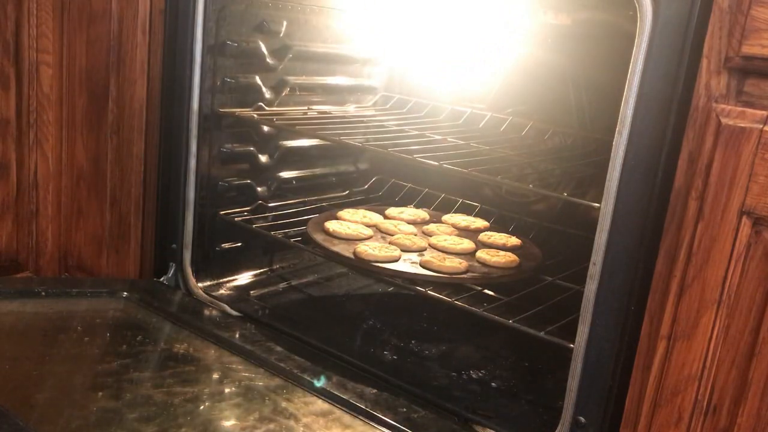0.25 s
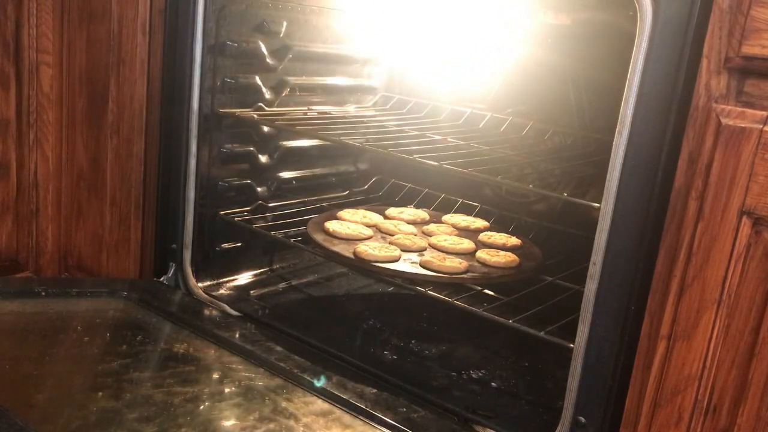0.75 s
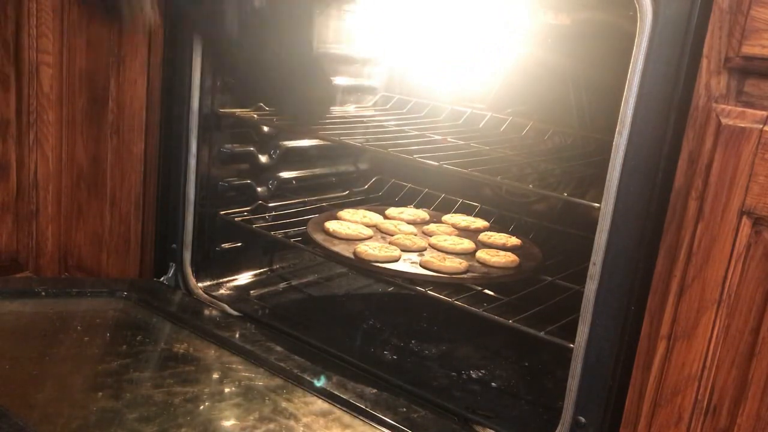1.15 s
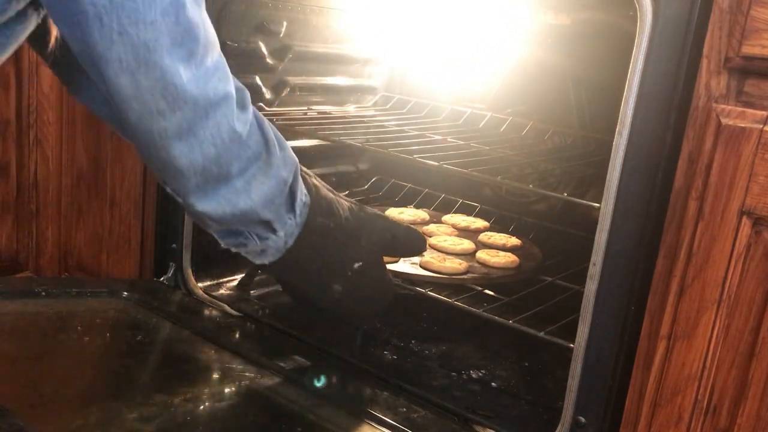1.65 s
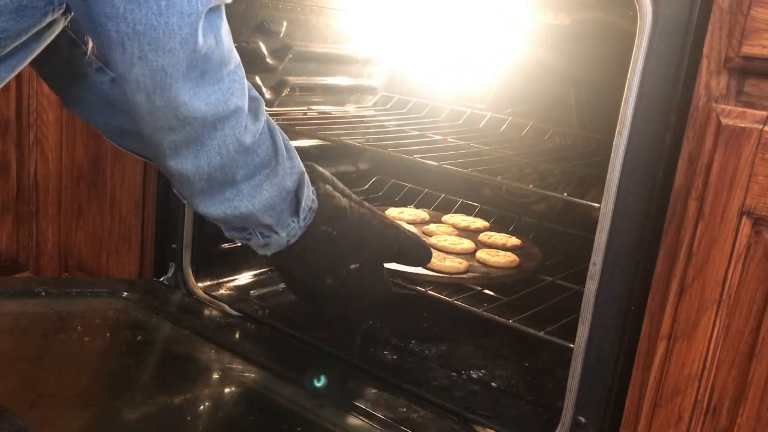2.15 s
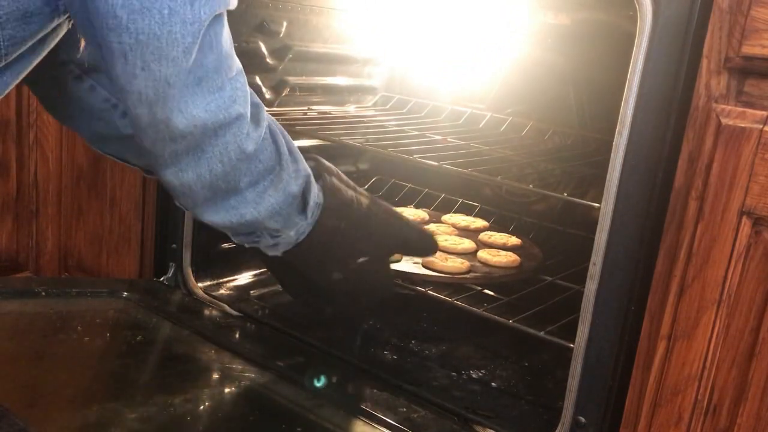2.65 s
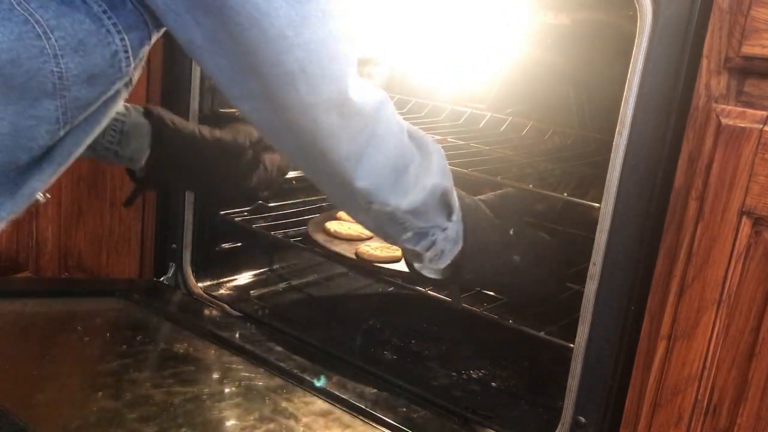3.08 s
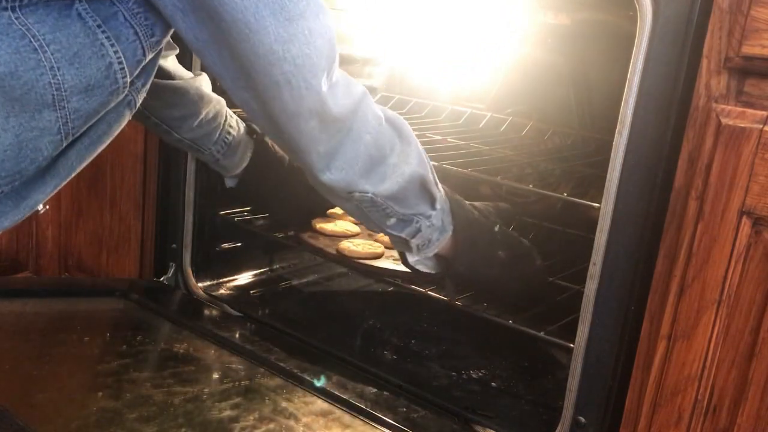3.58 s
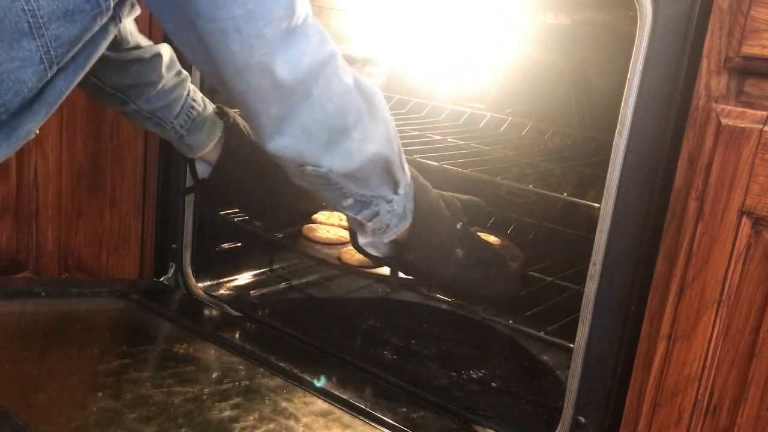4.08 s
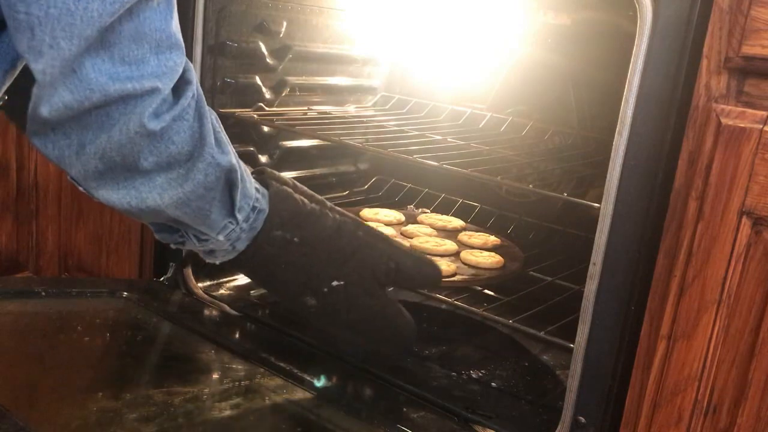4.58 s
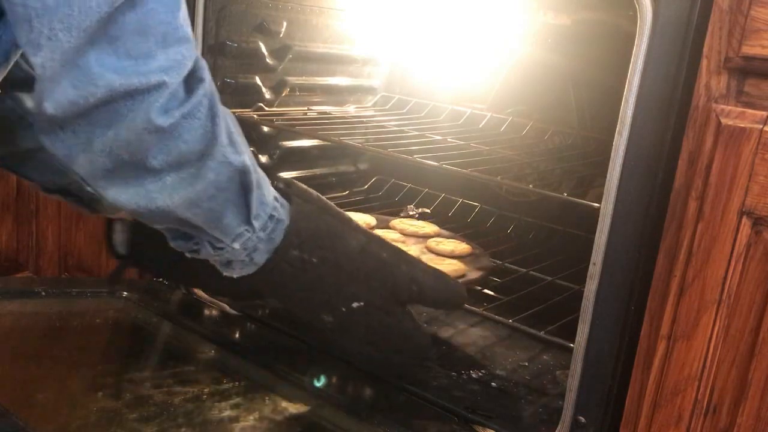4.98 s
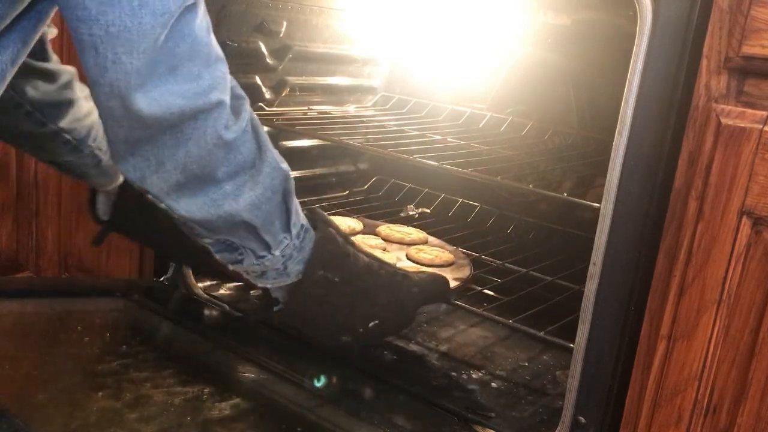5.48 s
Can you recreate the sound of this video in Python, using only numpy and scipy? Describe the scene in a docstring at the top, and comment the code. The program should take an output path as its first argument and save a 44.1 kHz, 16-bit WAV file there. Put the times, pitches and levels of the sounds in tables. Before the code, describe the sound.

A cupboard door bangs twice, then a metal baking pan clanks, scrapes and squeals over a wire oven rack.

```python
"""Baking pan out of the oven

A kitchen cupboard bangs twice nearby, a hard crack over a wooden boom. Then mitts work a metal pan
out of the open oven in short pulls: it clanks, scrapes and squeals over the wire rack, ringing and
shaking the oven's steel box. Sleeves rustle over faint room noise, all picked up by two closely
spaced microphones."""
import sys
import numpy as np
from scipy import signal
from scipy.fft import rfft, irfft
from scipy.io import wavfile
from scipy.ndimage import map_coordinates

SR = 44100
rng = np.random.default_rng(int(sys.argv[2]) if len(sys.argv) > 2 else 0)


def unload_wav(signal):
    """Save mono or channel-first audio to the path in sys.argv[1] as 16-bit WAV at rate SR, clipped to [-1, 1]."""
    wavfile.write(
        sys.argv[1],
        SR,
        np.round(np.clip(np.atleast_2d(signal).T, -1, 1) * 32767).astype(np.int16),
    )


N = 252693
TIME = np.arange(N) / SR

# kitchen reverb: (frequency [Hz], t60 [s])
ROOM_T60 = [(60, 0.92), (200, 0.6), (600, 0.46), (1500, 0.64), (3500, 0.54), (8000, 0.45), (15000, .36)]
# tone of the room noise: (frequency [Hz], level [dB])
ROOM_TONE = [(25, -19), (65, -3), (130, -8.5), (240, -8), (450, -12), (800, -17.5), (1800, -23),
             (3200, -25), (6200, -32), (10000, -34.5), (15000, -34.5)]

# sleeve and mitt swishes, one per arm movement: (time [s], half length [s], level [dB])
SWISHES = [(.55, 0.11, -68), (.8, 0.12, -72), (1.36, 0.32, -70), (2.797, 0.076, -60.5),
           (3.001, 0.032, -60.5), (3.242, 0.043, -60.5), (3.373, 0.034, -67.5), (3.576, 0.042, -52.5),
           (3.873, 0.13, -56.5), (4.177, 0.041, -59.5), (4.483, 0.022, -68), (4.977, 0.087, -54),
           (5.17, 0.026, -60), (5.366, 0.031, -65.5), (5.686, 0.085, -52.5)]
# tone of slipping cloth: (frequency [Hz], level [dB])
CLOTH_TONE = [(250, -21.5), (600, -17), (1100, -2), (2000, -5.5), (3500, -3.5), (7000, -5.5), (10000, -9),
              (15000, -9)]
# a mitt rubbing over the rim: (time [s], half length [s], level [dB])
RUBS = [(1.968, 0.0096, -74.5), (2.185, 0.025, -61.5), (2.375, 0.06, -71.5), (2.458, .01, -66),
        (4.846, .012, -53), (5.694, 0.02, -58)]
# tone of a mitt on metal: (frequency [Hz], level [dB])
RUB_TONE = [(200, -30), (900, 9.5), (3000, 8), (4300, 0), (6000, -1.5), (15000, -6)]
# soft hollow bumps: (time [s], peak level [dB])
BUMPS = [(0.124, -54), (1.892, -46), (2.745, -46.5), (3.058, -42)]

# cupboard hits: (time [s], contact [dB], rattle decay [s], treble gain [dB], thump [dB])
CUPBOARD_BANGS = [(.2489, 7.5, 0.00024, -3.5, -3), (.2567, -1.5, 0.0011, -9, -14),
                  (.266, -14, 0.0035, -2, 0), (.395, -13, 0.0043, -3, -16.5),
                  (.416, -20.5, 0.041, -1.5, -15), (.8688, 3, 0.0026, -17.5, -5),
                  (.8722, 7.5, 0.0026, 3, -4.5), (.884, 0, 0.046, -5, 5), (1.012, -38, 0.026, -4, -34)]
# tone of the door's crack: (frequency [Hz], level [dB])
CRACK_TONE = [(50, -21), (200, 1), (500, 2.5), (750, 2), (1200, 1.5), (2000, 5), (3300, 4.5), (4600, -1.5),
              (6500, -6), (9000, -12), (15000, -22)]
# ring of the door's catch: (frequency [Hz], energy [dB], t60 [s])
LATCH_MODES = [(1307, -5, 0.0063), (1510, -5, 0.0069), (2654, -7.5, 0.015), (3024, -1, 0.0063),
               (3860, -21.5, .008), (6010, -10.5, 0.0042)]
# boom of the wooden carcass: (frequency [Hz], energy [dB], t60 [s])
CUPBOARD_MODES = [(57.2, -10.5, 0.96), (72.6, -8.5, 0.14), (126, -6, 0.044), (178.5, -6, 0.13),
                  (216.6, -4.5, .13), (285, -7.5, 0.066), (330.7, -8, 0.055), (408, -12, 0.089),
                  (550, -11, 0.047), (716, -16.5, .05)]

# ring of the oven's steel box: (frequency [Hz], energy [dB], t60 [s])
OVEN_MODES = [(77.2, -7.5, 0.25), (175.6, -9, 0.21), (209.3, -10.5, 0.42), (240.4, -4.5, 0.41),
              (316, -9.5, 0.99), (374.3, -13, 0.42), (508, -29.5, 0.38), (607, -15, 0.14)]
# tone of the box's rumble: (frequency [Hz], level [dB])
RUMBLE_TONE = [(60, -29), (120, -5.5), (170, -2.5), (240, -6), (330, 0.5), (450, -10), (900, -8),
               (3000, -50.5)]
# tone of the box's deep boom: (frequency [Hz], level [dB])
BOOM_TONE = [(25, -33.5), (50, -1.5), (75, -2.5), (110, -19.5), (200, -32), (1000, -59)]

# light, bright ticks of metal: (time [s], level [dB])
TICKS = [(1.755, -38), (2.201, -16.5), (2.206, -21), (2.451, -36), (3.146, -30)]
# tone of a tick: (frequency [Hz], level [dB])
TICK_TONE = [(300, -5), (2000, 0.5), (4500, -7.5), (6000, 2.5), (6900, 11), (8500, -1), (12000, 2),
             (15500, 0.5)]
# squeals and groans of pan on wire:
# (start [s], end [s], start pitch [Hz], end pitch [Hz], bandwidth [Hz], level [dB])
SQUEALS = [(3.551, 3.604, 3026, 3260, 204, -45.5), (3.688, 3.702, 3280, 3300, 210, -42),
           (3.67, 4.17, 324, 320, 21, -49.5), (4.087, 4.264, 2800, 2790, 80, -62),
           (4.037, 4.25, 4270, 4340, 190, -68), (5.216, 5.295, 890, 550, 41, -57),
           (5.313, 5.5, 835, 800, 70, -52), (4.8, 5.5, 360, 330, 28, -53),
           (5.604, 5.77, 4130, 4600, 187, -58.5)]
# pan hitting the rack: (time [s], contact [dB], rattle decay [s], treble gain [dB], thump [dB])
PAN_CLANKS = [(1.684, -18.5, 0.026, -13, -14), (2.631, -40, 0.03, -6, -32),
              (3.044, -7.5, 0.014, 0.5, -16.5), (3.375, -26.5, 0.017, 3, -24),
              (3.515, -19.5, 0.044, 6.5, -9.5), (3.56, -8.5, 0.049, -2, -10),
              (3.595, -14, 0.0098, -5, -9.5), (3.694, -10, 0.0092, -0.5, -8.5),
              (3.756, -12.5, 0.043, -3, -16), (4.2455, -5, 0.017, 5, -12.5),
              (4.588, -31, 0.0082, 11, -23.5), (4.76, -10, 0.014, 3.5, -11.5), (4.911, 3, 0.021, -9, -9),
              (5.011, 5, 0.036, -3.5, -4), (5.07, 9.5, 0.018, -1, -9), (5.1, 5.5, 0.0066, -25, -4),
              (5.2, -15.5, 0.005, -3, -18), (5.505, -14.5, 0.017, -15, -21), (5.526, -8, 0.054, -16, -11)]
# short pulls over the rack: (start [s], length [s], scrape [dB], judder [dB])
PULLS = [(3.507, 0.13, -52, -45), (3.667, 0.29, -44, -52), (3.986, 0.39, -55, -64.5),
         (4.766, 0.15, -42, -54), (4.907, .19, -30.5, -48), (5.104, 0.11, -45.5, -42.5),
         (5.525, .09, -47, -46.5), (5.646, .11, -41.5, -57)]
# tone of pan-on-rack contact: (frequency [Hz], level [dB])
PAN_TONE = [(60, -20), (250, -7.5), (450, -1), (1000, 3.5), (1600, 2), (3000, -0.5), (4200, -5.5),
            (5200, -11.5), (7200, -11.5), (10000, -18), (15000, -28.5)]
# ring of the pan: (frequency [Hz], energy [dB], t60 [s])
PAN_MODES = [(797, -19, 0.98), (855, -13, 1), (937, -16.5, 1), (1040, -18, 0.5), (1190, -26, 1),
             (1516, -14, 0.31), (1625, -6.5, 0.18), (1713, -22, 1), (2276, -30.5, 0.14), (2400, -61, 0.62),
             (2640, -28, 0.39), (2880, -17, 0.21), (3550, -35, 0.14), (3880, -27.5, 0.81),
             (5650, -29, 0.13), (7170, -60, 0.2)]

REGRIP_S, GRIPPED_DB, FREE_DB = (4.24, 4.7), -7, -4  # the pan rings freer while the mitts change hold
PRESS_DB = -29  # scrape level at which the pan is pressed down hard enough to halve its ring
SIDE = np.array([[1], [-1]])  # opposite polarity, left and right


def amp(db):
    """Decibels to gain."""
    return 10 ** (np.asarray(db) / 20)


def unit(x):
    """Scale to an energy of one."""
    return x / np.sqrt(np.sum(x ** 2) + 1e-20)


def at_hz(points, hz):
    """Read a table on a log-frequency axis."""
    f, value = np.transpose(points)
    return np.interp(np.log(np.maximum(hz, 1)), np.log(f), value)


def convolve(x, response):
    """Pass a sound through an impulse response."""
    return signal.fftconvolve(x, response)[:len(x)]


def filtered(x, hz, kind="low", order=2):
    """Pass a sound through a gentle filter."""
    return signal.sosfilt(signal.butter(order, hz, kind, fs=SR, output="sos"), x)


def colour(tone, size=4096):
    """An EQ curve as a minimum-phase response of unit energy."""
    gains = amp(at_hz(tone, np.arange(size // 2 + 1) * SR / size))
    cepstrum = irfft(np.log(gains))
    cepstrum[1:size // 2] *= 2
    return unit(irfft(np.exp(rfft(cepstrum[:size // 2 + 1], size))))


def dying(t60):
    """One second of exponential decay."""
    return amp(-60 * TIME[:SR] / t60)


def swell(time, width):
    """A smooth rise and fall around one moment."""
    return np.exp(-.5 * ((TIME - time) / width) ** 2)


def ringing(modes):
    """Response of a struck body: a damped sine per mode, signs alternating."""
    return sum((-1) ** k * amp(db) * unit(np.sin(2 * np.pi * hz * TIME[:SR]) * dying(t60))
               for k, (hz, db, t60) in enumerate(modes))


def grains(per_s, spread_db):
    """Tiny contacts of uneven size at random moments; rms 1."""
    sizes = amp(spread_db * np.minimum(rng.exponential(1, N), 4)) * rng.choice([-1, 1], N)
    return unit(sizes * (rng.random(N) < per_s / SR)) * np.sqrt(N)


def blows(hits, per_s, click_s):
    """Each hit is a sharp contact that rattles out, plus a thump on the heavy body."""
    contact, thump = np.zeros((2, N + SR))
    chatter = grains(per_s, spread_db=-0.5)
    for time, db, decay_s, treble_db, thump_db in hits:
        at = int(time * SR)
        burst = unit(np.roll(chatter, -at)[:SR] * np.exp(-TIME[:SR] / decay_s))
        burst[0] += click_s / decay_s  # a short hit is one clean click, a long rattle starts softly
        burst = unit(burst)
        treble = filtered(burst, 3500, "high", order=1)
        contact[at:at + SR] += amp(db) * (burst + (amp(treble_db) - 1) * treble)
        thump[at] += amp(thump_db)
    return contact[:N], thump[:N]


def pull(start, length, attack_s=0.028, release_s=0.024):
    """Envelope of one pull: it takes hold, keeps its force and dies away."""
    age = np.maximum(TIME - start, 0)
    return np.minimum(age / attack_s, 1) * np.exp(-np.maximum(age - length, 0) / release_s)


def arm_movement(stretch=1):
    """Envelope of the moving arms: each swish swells and fades."""
    return np.sqrt(sum((amp(db) * swell(time, width * stretch)) ** 2 for time, width, db in SWISHES))


def diffuse(source, side_db):
    """A wide source reaches both microphones alike in the bass and ever less alike in the treble."""
    return source() + amp(side_db) * np.gradient(source()) * SIDE


def kitchen(x, early_db, early_t60, wet_db, build_up_s, wide_hz):
    """Direct sound, quick reflections off nearby panels and a tail dying band by band."""
    edges = np.geomspace(30, 18000, num=15)
    white = rng.standard_normal((2, 2, SR))
    echoes = 0
    for k, (low, high) in enumerate(zip(edges, edges[1:])):
        mid, side = filtered(white[k % 2], [low, high], "band")
        hz = np.sqrt(low * high)
        tail = unit(dying(at_hz(ROOM_T60, hz)) * (1 - np.exp(-TIME[:SR] / build_up_s)))
        decay = np.hypot(amp(early_db) * unit(dying(early_t60)), amp(wet_db) * tail)
        band_gain = np.sqrt(2 * (high - low) / SR * np.sum(decay ** 2))
        angle = np.pi / 4 * min(hz / wide_hz, 1)  # the image opens up toward the treble
        stereo = np.cos(angle) * unit(mid * decay) + np.sin(angle) * unit(side * decay) * SIDE
        echoes = echoes + band_gain * stereo
    return np.array([x + convolve(x, channel) for channel in echoes])


def room_noise(floor_db=-63, stir_db=-2.5):
    """A soft, bass-heavy bed, a little fuller while the cook moves."""
    gain = np.hypot(amp(floor_db), amp(stir_db) * arm_movement(stretch=3))
    return gain * convolve(rng.standard_normal(N), colour(ROOM_TONE))


def rack_wires(count=70, low_hz=1493, high_hz=14870, t60=0.18):
    """Response of the rack: every wire has a thin note of its own."""
    spots = (np.arange(count) + rng.random(count)) / count
    notes = low_hz + (high_hz - low_hz) * spots
    return unit(ringing([(hz, db, t60) for hz, db in zip(notes, rng.normal(0, 3, count))]))


def sleeves_and_mitts():
    """Denim slips in a fine hiss; mitts brush the wires in a pull and rub coarsely over the rim."""
    swish = amp(7) * arm_movement() * convolve(grains(per_s=15000, spread_db=2), colour(CLOTH_TONE))
    on_rack = np.minimum(sum(pull(start, length) for start, length, _, _ in PULLS), 1)
    brushed = amp(-3.5) * convolve(swish * on_rack, rack_wires())
    rub_gain = sum(amp(db) * swell(time, width) for time, width, db in RUBS)
    rub = rub_gain * convolve(grains(per_s=10000, spread_db=7), colour(RUB_TONE))
    return swish + brushed + rub


def bumps(hz=229, width_s=0.012):
    """A padded touch swells and fades on one low note."""
    return np.sin(2 * np.pi * hz * TIME) * sum(amp(db) * swell(time, width_s) for time, db in BUMPS)


def cupboard():
    """A wooden door and its catch: a hard crack over the boom of the carcass."""
    contact, thump = blows(CUPBOARD_BANGS, per_s=13000, click_s=0.0011)
    crack = amp(-1.5) * convolve(contact, colour(CRACK_TONE))
    latch = amp(-2.5) * convolve(contact, ringing(LATCH_MODES))
    return crack + latch + convolve(thump, ringing(CUPBOARD_MODES))


def oven_box(thump, judder, judder_gain):
    """Thumps and judder ring the steel box; each pull adds rumble and a deep boom."""
    ring = convolve(thump + judder, ringing(OVEN_MODES))
    rumble = convolve(judder, colour(RUMBLE_TONE))
    boom = amp(-5) * judder_gain * convolve(rng.standard_normal(N), colour(BOOM_TONE))
    return ring + rumble + boom


def ticks():
    """Small ticks of metal, each a short, bright shimmer of noise."""
    clicks = np.zeros(N + SR)
    for time, db in TICKS:
        at = int(time * SR)
        clicks[at:at + SR] += amp(db) * unit(rng.standard_normal(SR) * dying(t60=0.086))
    return amp(-2.5) * convolve(clicks[:N], colour(TICK_TONE))


def squeals():
    """A slipping edge sings briefly on a rough, gliding note."""
    out = np.zeros(N)
    for start, end, start_hz, end_hz, width_hz, db in SQUEALS:
        progress = np.clip((TIME - start) / (end - start), 0, 1)
        phase = 2 * np.pi * np.cumsum(start_hz + (end_hz - start_hz) * progress) / SR
        wander = filtered(rng.standard_normal((2, N)), width_hz / 2)
        note = unit(wander[0] * np.cos(phase) + wander[1] * np.sin(phase)) * np.sqrt(N)
        out += amp(db) * np.sqrt(np.abs(np.sin(np.pi * progress))) * note
    return out


def stick_slip(rate_hz, depth_db):
    """Fluttering gain of a sliding edge that catches and lets go many times a second."""
    flutter = filtered(rng.standard_normal(N), rate_hz)
    return amp(depth_db * flutter / np.std(flutter))


def paired(modes, split=0.0067):
    """A pan is never quite round: each mode splits into two that beat."""
    return [(hz * (1 + sign * split * rng.uniform(0.48, 1)), db + 2.5, t60)
            for hz, db, t60 in modes for sign in (-1, 1)]


def pan_on_rack():
    """Clanks and scrapes ring the pan, muffled by the mitts, and shake the oven box under it."""
    contact, thump = blows(PAN_CLANKS, per_s=6000, click_s=0.0024)
    scrape_gain = sum(amp(db) * pull(start, length) for start, length, db, _ in PULLS)
    judder_gain = sum(amp(db) * pull(start, length) for start, length, _, db in PULLS)
    catching = stick_slip(rate_hz=45, depth_db=2.5)
    drive = contact + amp(-6) * scrape_gain * catching * grains(per_s=2500, spread_db=0.5)
    judder = amp(1) * judder_gain * catching * grains(per_s=510, spread_db=8)
    regripping = (TIME > REGRIP_S[0]) & (TIME < REGRIP_S[1])
    freedom = amp(np.where(regripping, FREE_DB, GRIPPED_DB)) / (1 + scrape_gain / amp(PRESS_DB))
    clatter = amp(-3) * convolve(drive, colour(PAN_TONE))
    ring = convolve(drive * freedom, ringing(paired(PAN_MODES)))
    return clatter + ring, oven_box(thump, judder, judder_gain)


def scene():
    """The pan sounds from inside the oven, the cupboard from across the room, the sleeves up close."""
    pan, box = pan_on_rack()
    metal = pan + squeals() + ticks()
    inside = kitchen(metal, early_db=-4.5, early_t60=0.042, wet_db=-6, build_up_s=0.0014, wide_hz=14400)
    # the oven's walls radiate straight into the room
    walls = kitchen(box, early_db=-21, early_t60=0.063, wet_db=-1, build_up_s=0.0082, wide_hz=13600)
    door = kitchen(cupboard(), early_db=-1, early_t60=0.083, wet_db=-7, build_up_s=0.011, wide_hz=13000)
    cloth = diffuse(sleeves_and_mitts, side_db=-26.5)
    bed = diffuse(room_noise, side_db=-32.5)
    return inside + walls + door + bumps() + cloth + bed


def record(dry, lag_samples=1.03, cutoff_hz=15600):
    """Sound reaches the left microphone a moment later; a steep low-pass cuts the top."""
    left = map_coordinates(dry[0], [np.arange(N) - lag_samples], order=3)
    return signal.sosfilt(signal.ellip(10, .2, 80, cutoff_hz, fs=SR, output="sos"), [left, dry[1]])


dry = scene()
out = record(dry)
unload_wav(out)
```